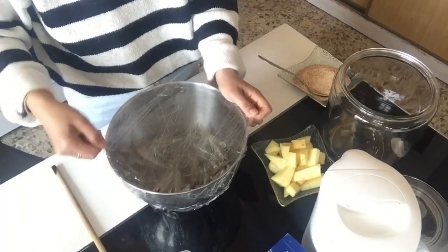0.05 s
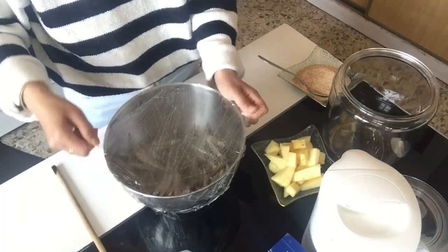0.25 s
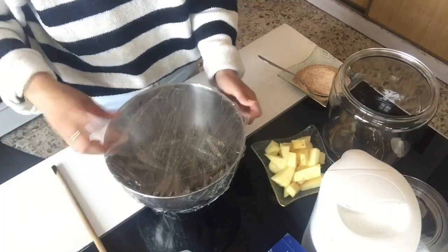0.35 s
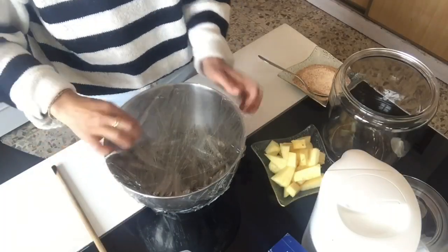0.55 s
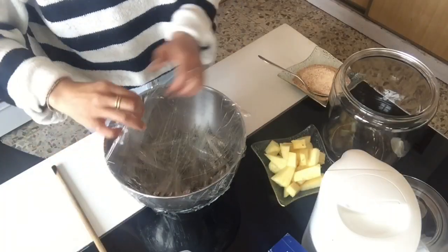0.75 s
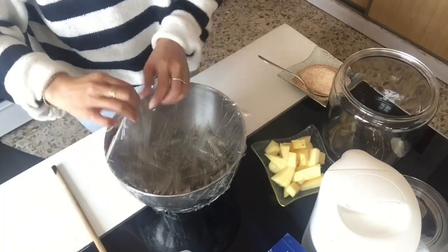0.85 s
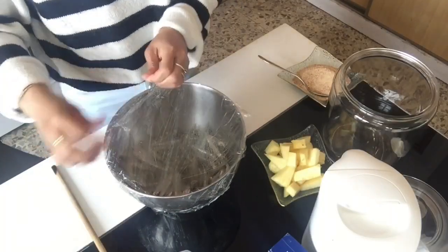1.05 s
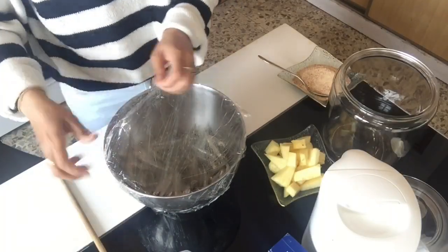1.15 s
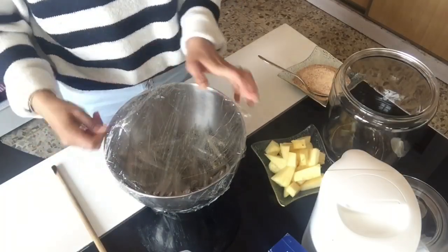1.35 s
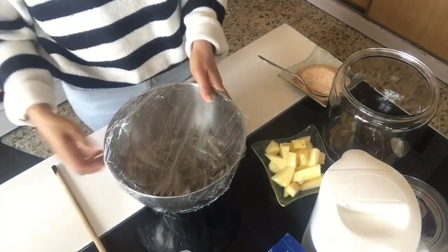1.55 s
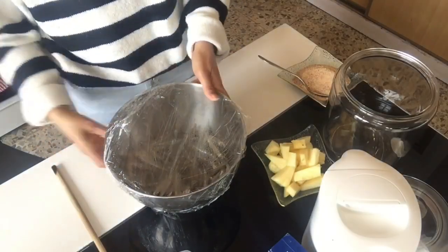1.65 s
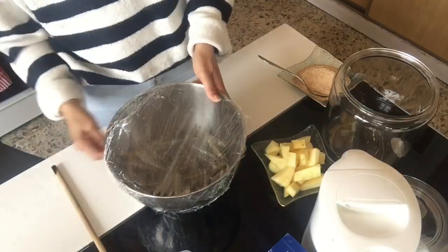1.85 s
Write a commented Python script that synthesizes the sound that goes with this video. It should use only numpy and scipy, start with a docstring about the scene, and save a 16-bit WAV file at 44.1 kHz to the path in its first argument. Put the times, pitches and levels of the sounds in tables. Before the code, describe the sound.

Close microphone in a small kitchen: stretched cling film rustles and snaps in bursts as hands grip a metal bowl, which bumps and briefly drags on the counter, over faint steady room tone.

```python
"""Cling film stretched over a metal bowl crinkles and snaps as hands grip and turn it, heard close.
Snaps are short bursts of random grains, rustle is dense crackle in four bands; both ring the film as a skin.
The bowl knocks and drags on a kitchen counter: pushes and noise ring decaying modes of counter, rim and
cupboard. A small hard room answers through feedback delays, over a steady room tone."""
import sys
import numpy as np
from scipy import signal
from scipy.fft import rfft, irfft, next_fast_len
from scipy.io import wavfile

SR = 44100
rng = np.random.default_rng(int(sys.argv[2]) if len(sys.argv) > 2 else 0)


def transcribe(u):
    """Save the signal u as a 16-bit wav file named by the first command-line argument.

    u: samples, shape (n,) or (channels, n), limited to [-1, 1]; the rate is SR.
    q: integer samples, one column per channel.
    """
    v = np.clip(np.atleast_2d(u).T, -1, 1)
    q = np.round(v * 32767).astype(np.int16)
    wavfile.write(sys.argv[1], SR, q)


N = 83790

# The film's dull, body, bright and air parts: (low edge [Hz], high edge [Hz])
FILM_BANDS = [(400, 1900), (1900, 4800), (4800, 7800), (7800, 15800)]
# Modes of the kitchen counter: (frequency [Hz], level [dB], time to fall 60 dB [s])
COUNTER_MODES = [(149.6, -15.5, 0.17), (220.3, -3.5, 0.066), (304, -4.5, 0.037), (490, -14, 0.06)]


def amp(db):
    """Turn dB into gain."""
    return 10 ** (np.asarray(db) / 20)


def rms_one(x):
    """Scale to rms 1."""
    return x / np.sqrt(np.mean(x ** 2) + 1e-20)


def in_time(rows):
    """Draw each column of a timed table as a curve, sample by sample."""
    s, *columns = np.transpose(rows)
    return [np.interp(np.arange(N) / SR, s, column) for column in columns]


def band(x, low, high):
    """Steep band-pass between two edges in Hz."""
    return signal.sosfilt(signal.butter(4, [low, high], "band", fs=SR, output="sos"), x)


def drift(rate_hz):
    """Slow random wander of rms 1: noise through a two-pole low-pass."""
    settle = 4000  # samples dropped while the filter settles
    r = np.exp(-2 * np.pi * rate_hz / SR)
    wander = signal.lfilter([1], [1, -2 * r, r * r], rng.standard_normal(N + settle))
    return rms_one(wander[settle:])


def ring(force, modes):
    """Decaying modes of a solid body, all driven by one force."""
    out = 0
    for hz, db, t60 in modes:
        r = amp(-60 / (max(t60, .01) * SR))
        w = 2 * np.pi * hz / SR
        resonator = [1, -2 * r * np.cos(w), r * r]
        out = out + amp(db) * signal.lfilter([0, np.sin(w)], resonator, force + 1e-18)
    return out


def crackle(rate, spread_db, shape):
    """Random clicks of very uneven size and either sign, at a mean rate per second."""
    size = amp(spread_db * np.minimum(rng.exponential(1, shape), 5))
    sign = rng.choice([-1, 1], shape)
    return size * sign * (rng.random(shape) < rate / SR)


def humped(x):
    """The film's broad resonances, added on top of the plain sound."""
    # Frequencies the film favours: (frequency [Hz], width [Hz], extra gain [linear])
    resonances = [(2240, 3600, 0.29), (6190, 500, 3.6)]
    extra = sum(gain * signal.lfilter(*signal.iirpeak(hz, hz / width, fs=SR), x)
                for hz, width, gain in resonances)
    return x + extra


def hush():
    """Steady room tone: noise shaped by a spectrum curve over log frequency."""
    # Room tone spectrum: (frequency [Hz], relative level per Hz [dB])
    tone_spectrum = [(18, -52), (30, -50.5), (153, 12.5), (170, -4), (364, -3), (866, -6.5), (1720, -8),
                     (3580, -11.5), (16000, -20.5)]
    hz, db = np.transpose(tone_spectrum)
    f = np.maximum(np.arange(N // 2 + 1) * SR / N, 1)
    shape = amp(np.interp(np.log(f), np.log(hz), db))
    tone = irfft(rfft(rng.standard_normal(N)) * shape, N)
    return amp(-69) * rms_one(tone)  # rms level in dB, ahead of the microphone


def room(x):
    """Small hard room: ten feedback delays, each duller on every round."""
    t60_s, wall_cut_hz = 0.42, 8600
    size = next_fast_len(2 * N)
    w = 2 * np.pi * np.arange(size // 2 + 1) / size
    dull = np.exp(-2 * np.pi * wall_cut_hz / SR)
    wall = (1 - dull) / (1 - dull * np.exp(-1j * w))
    lags = np.geomspace(.013, .041, 10) * rng.uniform(.96, 1.04, 10) * SR  # samples
    total = 0
    for k, lag in enumerate(lags):
        loss = amp(-60 * lag / SR / t60_s) * wall ** (lag / SR * 20)  # longer paths lose more treble
        loop = loss * np.exp(-1j * w * lag)
        total = total + (-1) ** k * loop / (1 - loop)
    return irfft(rfft(x, size) * total, size)[:N]


def drag():
    """The dragging bowl shakes the counter and the cupboard below with friction noise."""
    # Dragging over time: (time [s], counter level [dB], cupboard level [dB])
    drag_levels = [(0.07, -72, -71), (0.142, -49, -55), (0.19, -56, -68), (0.214, -36, -62),
                   (0.274, -40.5, -35), (0.322, -49.5, -53), (0.47, -64.5, -52.5), (0.52, -56, -86),
                   (0.68, -65.5, -77), (0.78, -52, -59), (0.89, -56.5, -76), (1.04, -61, -74.5),
                   (1.098, -43.5, -42), (1.296, -78.5, -80.5), (1.41, -58.5, -57.5), (1.454, -45.5, -46.5),
                   (1.624, -77.5, -71), (1.9, -78.5, -85)]
    # Boom of the cupboard: (frequency [Hz], level [dB], time to fall 60 dB [s])
    cupboard_modes = [(66, 0, 0.12)]
    out = 0
    for db, modes in zip(in_time(drag_levels), [COUNTER_MODES, cupboard_modes]):
        out = out + amp(db) * rms_one(ring(rng.standard_normal(N), modes))
    return out


def knocks():
    """Soft pushes ring the counter; the rim chatters and rings unevenly as the bowl rocks."""
    # Bowl meeting counter: (time [s], push level [dB], rim drive relative to the push [dB])
    bowl_hits = [(0.097, -41.5, -34), (0.126, -28.5, -33), (0.2047, -16.5, -43), (0.523, -50, -11),
                 (0.755, -33, -29), (1.026, -35, -39), (1.068, -30, -32.5), (1.084, -23.5, -17.5),
                 (1.357, -40.5, -17.5), (1.422, -32, -22), (1.434, -25, -17.5)]
    # Modes of the bowl: (frequency [Hz], level [dB], time to fall 60 dB [s])
    bowl_modes = [(891, -5, 0.24), (1490, -6, 0.26), (1520, -6, 0.26), (1976, -12, 0.15), (2437, -6, 0.18),
                  (4005, -11, 0.09)]
    softness_hz, chatter_s = 503, 0.01
    s, db, rim_db = np.transpose(bowl_hits)
    at = (s * SR).astype(int)
    push, tap = np.zeros((2, N))
    push[at] = amp(db)
    tap[at] = amp(db + rim_db)
    # a two-pole low-pass rounds each push
    r = np.exp(-2 * np.pi * softness_hz / SR)
    soft_push = signal.lfilter([(1 - r) ** 2], [1, -2 * r, r * r], push)
    thud = band(ring(soft_push, COUNTER_MODES), 130, 4000)
    # each tap becomes a short dying burst of noise on the rim
    fade = np.exp(-1 / (chatter_s * SR))
    envelope = np.sqrt(1 - fade ** 2) * signal.lfilter([1], [1, -fade], tap)
    chatter = envelope * rng.standard_normal(N)
    unevenness = amp(1.9 * drift(30))
    return thud + unevenness * ring(chatter, bowl_modes)


def skin(force):
    """The stretched film rings as a drum skin, driven by its own snaps and rustle."""
    # Modes of the skin: (frequency [Hz], level [dB], time to fall 60 dB [s])
    skin_modes = [(495, -4.5, 0.14), (998, -7, 0.11)]
    return amp(-37.5) * ring(force, skin_modes)


def rustle():
    """Dense tiny crackles; each band of the film follows its own flickering level."""
    # One list per grip: (time [s], bright level [dB], dull level [dB], body level [dB], air level [dB])
    grips = [
        [(0.0, -67, -76, -68.5, -73), (0.06, -54, -69, -50.5, -48), (0.118, -58, -65.5, -61, -56),
         (0.128, -53, -58.5, -56.5, -50), (0.19, -64.5, -57.5, -60, -60), (0.205, -57, -54, -59, -61)],
        [(0.226, -38, -40.5, -25, -30.5), (0.248, -41.5, -33, -34.5, -40.5), (0.334, -57, -52.5, -49.5, -54.5),
         (0.47, -54, -63, -54.5, -57.5), (0.578, -65.5, -56.5, -64.5, -66.5), (0.6, -58, -49.5, -56.5, -55),
         (0.672, -62, -58, -65.5, -59.5), (0.7, -50.5, -53.5, -54, -49.5)],
        [(0.719, -46, -36.5, -42, -42.5), (0.81, -45, -43, -45, -46.5), (0.905, -48, -51, -50, -46.5),
         (0.911, -51.5, -50.5, -50.5, -49.5), (1.083, -53, -47, -51.5, -53),
         (1.237, -90.5, -75.5, -79.5, -94.5), (1.33, -77.5, -73, -76, -80)],
        [(1.354, -35.5, -48.5, -57.5, -40.5), (1.366, -39.5, -65, -56.5, -58)],
        [(1.374, -31, -52, -49, -43), (1.446, -46.5, -50, -57.5, -54.5), (1.568, -64, -72, -75, -76),
         (1.614, -62.5, -74.5, -67, -64), (1.645, -71, -81, -73.5, -78.5), (1.81, -84.5, -83.5, -88, -85),
         (1.836, -56.5, -79, -64, -54.5), (1.9, -55.5, -66.5, -55, -53.5)],
    ]
    crackles_per_s, spread_db, flicker_db = 9000, 3, 1.1
    grains = humped(crackle(crackles_per_s, spread_db, N))
    rows = []
    for grip in grips:
        if rows:
            # hold the old level until 4 ms ahead, so that the grip starts abruptly
            rows.append((grip[0][0] - .004, *rows[-1][1:]))
        rows += list(grip)
    bright, dull, body, air = in_time(rows)
    shared = drift(55)
    out = 0
    for db, edges in zip([dull, body, bright, air], FILM_BANDS):
        flicker = flicker_db * (shared + drift(38))  # partly common to all bands
        out = out + amp(db + flicker) * rms_one(band(grains, *edges))
    return out


def snaps():
    """Each crease creaks up to a sharp edge, then its grains die in a few ms, duller bands slower."""
    # Creases snapping; levels ahead of the halving below:
    # (time [s], bright level [dB], then dull, body and air levels relative to bright [dB])
    creases = [(0.0204, -39, -38, -8, 3.5), (0.0616, -35.5, -28, 1, -3), (0.1494, -44, 9.5, -1, -12),
               (0.211, -18.5, -7.5, 6, 6), (0.2198, -7, -7.5, -3, -9), (0.2299, -28, -15, 7, -10),
               (0.2367, -19.5, -7, -13, -16), (0.4282, -34.5, -33, -2, -15), (0.444, -35.5, -32, -10, 1.5),
               (0.5251, -46.5, 9.5, -11, -6), (0.5365, -50.5, -2, 13, 2), (0.5438, -47.5, 13, -2, -2),
               (0.5848, -44.5, 9.5, -5, -10), (0.597, -42.5, 2.5, 2, 0), (0.6472, -51, -7, -10, -9),
               (0.704, -37, -1.5, -6, 1), (0.7178, -31.5, 3.5, 1.5, 6), (0.7547, -25.5, 4, 3, -6),
               (0.767, -39, 10, 3, -8), (0.82, -21.5, -15, -10, -10), (0.8316, -23, -6, -1.5, -3),
               (0.8397, -29, -3, -5, -7), (0.8543, -25, -1, 1, -2), (0.8806, -37, -30, -32, -17),
               (0.8967, -18.5, -13, -6, -1.5), (0.894, -23, -13.5, -2.5, -7),
               (0.9664, -23.5, -8.5, -6.5, 0.5), (1.01, -36, 3, -2, -8), (1.0178, -25, 1, -1, -4),
               (1.0849, -36, 7, 1, -14), (1.348, -13.5, -26.5, -26.5, -14.5),
               (1.3712, -13.5, -37, -53.5, -22.5), (1.376, -26.5, -44, -17, -16),
               (1.3889, -29.5, -39, -20, -9.5), (1.83, -52, -28, -6, -13), (1.8446, -39, -37.5, -25, -5),
               (1.8655, -32.5, -25, -10, -3.5), (1.8954, -32.5, -21, -4, -5)]
    # Decay time constants of the dull, body, bright and air bands: [s]
    decays = [0.0035, 0.0018, 0.00097, 0.00089]
    rise_s, grain_spread_db = .0009, 4.5
    length = 1200  # samples per snap
    t = np.arange(length) / SR - rise_s  # zero at the sharp edge
    out = np.zeros(N + length)
    grains = crackle(SR / 2, grain_spread_db, (len(creases), length))
    grains[:, int(rise_s * SR)] = 6  # the sharp edge itself
    grains = grains * np.clip(1 + t / rise_s, 0, 1) ** 3  # creak swelling up to the edge
    for (s, db, dull, body, air), burst in zip(creases, grains):
        i = int(s * SR)
        for rel_db, tau, edges in zip([dull, body, 0, air], decays, FILM_BANDS):
            dying = burst * np.exp(-np.maximum(t, 0) / tau)
            part = band(humped(dying), *edges)
            strength = np.sqrt(np.sum(part ** 2) / (tau * SR))
            out[i:i + length] += amp(db + rel_db) * part / strength / 2
    return out[:N]


def scene():
    """Film, bowl and counter close by; the room answers all but the direct rustle and the room tone."""
    hits, film = snaps(), rustle()
    near = hits + knocks() + drag() + skin(hits + film)
    echo = amp(-21.5) * room(near)
    return (near + film + echo + hush())[None]


def record(dry):
    """The microphone loses the deepest bass and dips in the treble, then comes a steep top cut."""
    low_cut_hz, top_cut_hz = 59.6, 16700
    dip_hz, dip_width_hz, dip_depth = 10400, 900, .4
    x = signal.sosfilt(signal.butter(4, low_cut_hz, "high", fs=SR, output="sos"), dry)
    dip = signal.lfilter(*signal.iirpeak(dip_hz, dip_hz / dip_width_hz, fs=SR), x)
    x = x - dip_depth * dip
    return signal.sosfilt(signal.cheby2(14, 70, top_cut_hz, fs=SR, output="sos"), x)


dry = scene()
out = record(dry)
transcribe(out)
```